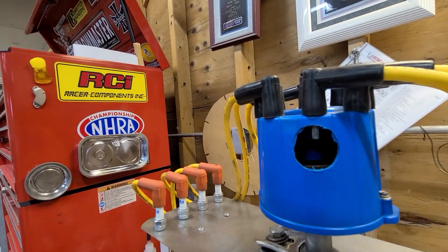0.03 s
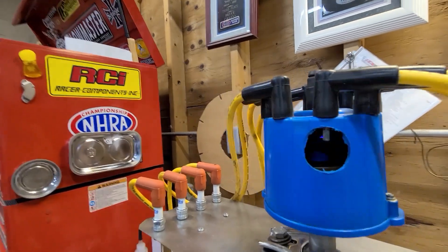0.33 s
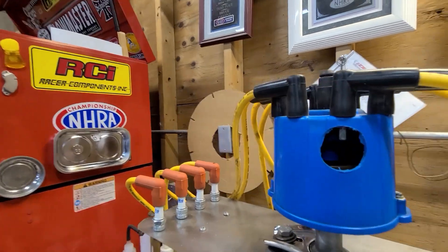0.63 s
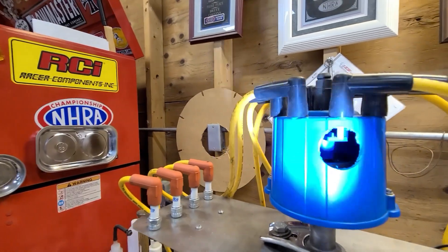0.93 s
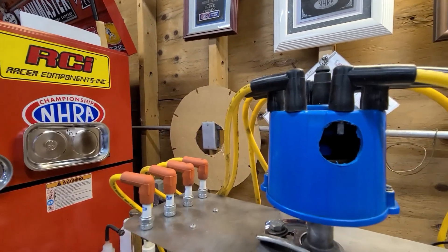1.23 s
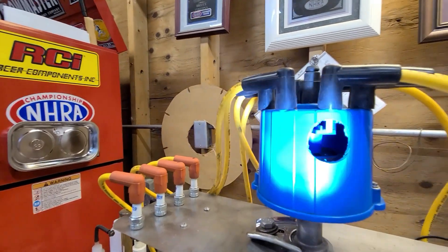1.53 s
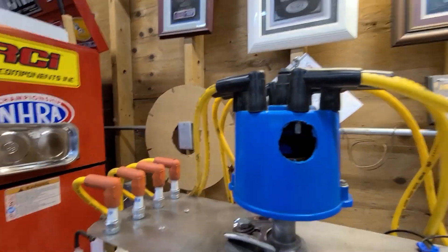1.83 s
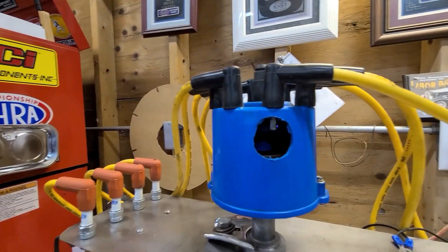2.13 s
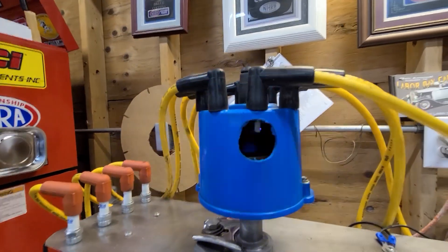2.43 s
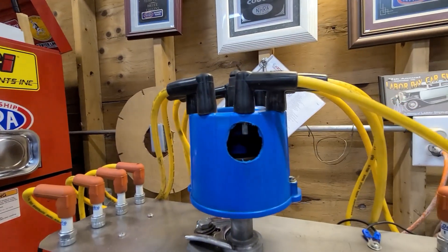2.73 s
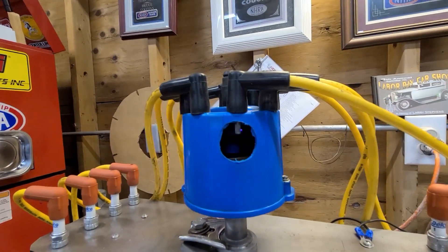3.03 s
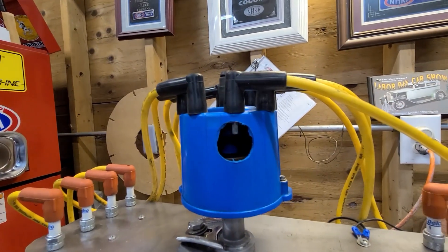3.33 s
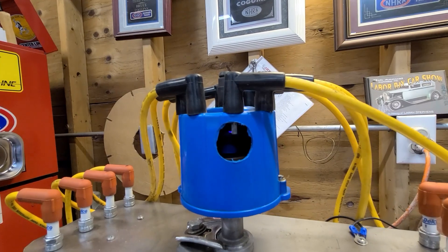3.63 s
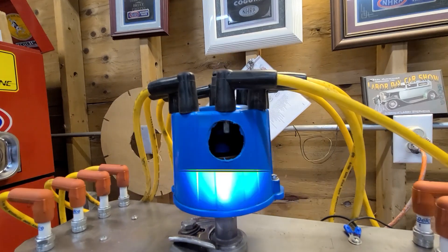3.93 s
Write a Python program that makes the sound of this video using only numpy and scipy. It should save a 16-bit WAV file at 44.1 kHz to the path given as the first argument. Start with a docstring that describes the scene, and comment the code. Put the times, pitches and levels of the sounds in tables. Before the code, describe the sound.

An ignition distributor spins on a test stand for the whole four seconds, its sparks snapping so fast that they blend into a bright, ringing buzz. Underneath, the drive hums with a rapid throb, thin whines, a bearing buzz and a soft motor rush. The high ringing is loudest at about 2.3 seconds as the close microphone drifts past, then eases back. The speed stays nearly constant in the small workshop.

```python
"""An eight-post ignition distributor spins on a test stand in a small wooden workshop.
From the start, eight sparks a turn crack inside the cap and set its parts ringing, while the
drive hums, knocks once a turn, whines and buzzes over the soft rush of its motor.
A hand-held microphone drifts slowly past: the cap's ring is loudest at about 2.3 seconds,
then eases back as the shaft spins on at nearly the same speed."""
import sys
import numpy as np
from scipy import signal
from scipy.fft import rfft, irfft
from scipy.io import wavfile
from scipy.ndimage import map_coordinates

SR = 44100
rng = np.random.default_rng(int(sys.argv[2]) if len(sys.argv) > 2 else 0)


def persist_wave(psi):
    """Save psi, clipped to +-1, as 16-bit WAV."""
    counts = np.round(np.clip(psi, -1, 1) * 32767).astype(np.int16)
    wavfile.write(sys.argv[1], SR, np.atleast_2d(counts).T)


N = 176400

# the eight sparks (place [turns], relative ring level [dB], ring fade [ms], relative crack level [dB])
POSTS = [(0, -3, 3.3, -5), (.128, -13, .8, -13), (.27, -6, 1.7, -6), (.388, -8.5, 1.0, -12),
         (.507, -5.5, .7, -11), (.622, -6, .6, -12), (.754, -4.5, .6, -5), (.874, 0, .75, -2.5)]
# loudness as the microphone drifts (time [s], cap ring gain [dB], crack gain [dB])
DRIFT_GAINS = [(0.0, -18, -25), (0.6, -18.5, -23.5), (1.25, -17, -23), (1.7, -16.5, -24.5),
               (2.3, -14.5, -26), (2.75, -18.5, -25.5), (3.3, -18.5, -25.5), (3.75, -18, -25),
               (4.0, -19, -26)]
# how much the right side is shaded from the ringing (time [s], extra drop [dB])
RIGHT_SHADE = [(0, 16), (.6, 16), (1.25, 8.5), (1.7, 17), (2.3, 16), (2.75, 20), (4, 17)]


def spark_pulses(turn, jitter_s=8e-6, scatter_db=0.59):
    """Each post sparks once a turn, a little uneven in time and strength: one row of pulses per post."""
    t = np.arange(N) / SR
    turns = np.arange(int(turn[-1]) + 1)
    rows = []
    for position, *_ in POSTS:
        early_late, weak_strong = rng.standard_normal((len(turns), 2)).T
        times = np.interp(turns + position, turn, t, right=2 * t[-1]) + jitter_s * early_late
        rows.append(clicks(times, undb(scatter_db * weak_strong)))
    return rows


def cap_ring(sparks, pitch_hz=7766, attack_s=0.00031):
    """Each spark makes the hollow cap ring with a very short, high ping."""
    age = np.arange(SR // 10) / SR
    tone = np.sin(2 * np.pi * pitch_hz * age)
    pings = np.zeros(N)
    for pulses, (_, ring_db, fade_ms, _) in zip(sparks, POSTS):
        swell = (1 - np.exp(-age / attack_s)) * np.exp(-age * 1000 / fade_ms)
        pings += undb(ring_db) * ring(pulses, swell / swell.max() * tone)
    heard = in_room(pings, pan_db=3.1 + curve(RIGHT_SHADE), echo_db=-15.5)
    return heard * undb(curve(DRIFT_GAINS) - 1)


def spark_crack(sparks, turn, fade_s=0.0006, sizzle=0.069):
    """Each spark is a snap of bright noise, with a faint sizzle in between."""
    # tone of the crack (frequency [Hz], relative level [dB])
    spectrum = [(2000, 0.5), (4000, -18), (5500, 2.5), (7000, 1.5), (8800, 17), (9150, -13), (10200, -1.5),
                (11200, -4.5), (13000, 5), (14500, 6.5), (15700, 8.5)]
    fade = np.exp(-np.arange(SR // 10) / SR / fade_s)
    bursts = sum(undb(crack_db) * ring(pulses, fade) for pulses, (*_, crack_db) in zip(sparks, POSTS))
    sides = []
    for side in range(2):
        snaps = colour((bursts + sizzle) * turning_noise(turn, fresh=0.72), spectrum)
        sides.append(in_room(snaps, pan_db=5, echo_db=-3.5)[side])
    return np.array(sides) * undb(curve(DRIFT_GAINS, axis=2) + 2)


def parts_ring(sparks):
    """The sparks strike cap, rotor and posts, which ring on longer at their own pitches."""
    # ringing tones; narrow ones last longer (pitch [Hz], width [Hz], relative level [dB])
    tones = [(4820, 15, -22), (5398, 30, 1), (5630, 23, -4.5), (5820, 31, -10), (6360, 47, -37),
             (6554, 104, 8.5), (6700, 61, -2.5), (7440, 26, 1), (8150, 50, -3.5), (8280, 42, -2),
             (8600, 23, -3), (8810, 53, -7)]
    # how those tones rise and fall (time [s], gain below 6 kHz [dB], gain above [dB])
    tone_gains = [(0, 2, 0), (.6, -0.7, -1), (1.25, 2, -2.3), (1.7, 3, 0), (2.3, -1.4, 0.2), (4, -.7, 1)]
    low, high = undb(curve(tone_gains)), undb(curve(tone_gains, axis=2))
    age = np.arange(SR // 10) / SR
    blows = sum(sparks)
    ringing = np.zeros(N)
    for hz, width, db in tones:
        ping = np.exp(-np.pi * width * age) * np.sin(2 * np.pi * hz * age)
        ringing += undb(db) * (low if hz < 6000 else high) * unit(ring(blows, ping))
    return in_room(ringing, pan_db=2.5 + curve(RIGHT_SHADE), echo_db=0.5) * undb(-23)


def drive_hum(turn, size=256):
    """The bass of the drive throbs once a turn, and a knock rings the stand a little later."""
    # tones of the hum (pitch [times shaft speed], relative level [dB])
    harmonics = [(1, -35), (2, -23.5), (3, -6), (4, 1), (5, -17), (6, -20.5), (7, -9), (8, -13), (9, -10.5),
                 (10, -3.5), (11, -25.5), (12, -13), (13, -19), (14, -9), (15, -11.5), (16, -8.0),
                 (17, -20.5), (18, -7), (19, -16), (20, -23.0), (21, -20.5), (22, -15), (23, -16), (24, -2),
                 (25, -11.5), (26, -17), (27, -24), (28, -22.5), (29, -17), (30, -17.5), (31, -10.5),
                 (32, -13.5), (33, -11.5), (34, -15.5), (35, -18.5), (36, -25.5), (37, -17.5), (38, -29),
                 (39, -37.5)]
    # groups of tones below the knock
    # (first [times shaft speed], last [times shaft speed], swell place [turns], phase scatter [rad])
    groups = [(1, 6, 0, .35), (7, 11, .15, 1.3), (12, 20, .12, .8)]
    knock = (groups[-1][1] + 1, len(harmonics), 0.22, 0.36)  # the remaining tones, same columns
    multiples, db = np.array(harmonics).T
    # shift the tones so that each swell starts sharply and dies away (minimum phase)
    gains = undb(np.interp(np.arange(size // 2 + 1), multiples, db))
    cepstrum = irfft(np.log(gains))
    shift = rfft(2 * cepstrum[:size // 2], size).imag
    hum = np.zeros(N)
    for first, last, swell_at, scatter in groups + [knock]:
        for k in range(first, last + 1):
            phase = 2 * np.pi * k * (turn - swell_at) + shift[k] + scatter * rng.standard_normal()
            hum += undb(db[k - 1]) * np.cos(phase)
    return two_sides(unit(hum)) * stereo_gain(-24.5, pan_db=-1.8)


def bearing_buzz(turn, throb_depth=0.58):
    """Bearings and belt scrape much the same way on every turn, throbbing as the posts pass."""
    # tone of the buzz (frequency [Hz], relative level [dB])
    spectrum = [(700, 0), (1000, -0.5), (1300, -4.5), (1480, -0.5), (1620, 1.5), (1950, -1), (2100, 7),
                (2300, -7), (2500, -1), (2750, -10.5), (3480, 2), (3900, -7), (4700, 0), (6000, -11.5)]
    throb = 1 + throb_depth * np.cos(2 * np.pi * len(POSTS) * turn - 1)
    scrapes = [throb * turning_noise(turn, fresh=0.24) for _ in range(3)]
    shared, left, right = (unit(colour(scrape, spectrum)) for scrape in scrapes)
    buzz = 1.28 * two_sides(shared) + np.array([left, right])
    return unit(buzz) * stereo_gain(-34.5, pan_db=1.5)


def motor_rush():
    """The motor makes a soft, even noise, mostly alike on both sides."""
    # tone of the rush (frequency [Hz], relative level [dB])
    spectrum = [(20, -30), (32, -24), (42, -19), (58, 9), (80, -0.5), (200, -4), (500, -5), (720, -2.5),
                (1200, -14), (3500, -8), (8000, -20), (16000, -24)]
    noise = rng.standard_normal(N) + .5 * rng.standard_normal((2, N))
    return unit(colour(noise, spectrum)) * undb(-39)


def drive_whines(turn):
    """The stand favours a few high tones of the drive, heard as thin whines."""
    # the whines (pitch [times shaft speed], level [dB], left minus right [dB])
    tones = [(40, -48.5, 8), (44, -51, 8), (47, -52.5, 7), (63, -50, 6), (73, -49, -7), (87, -52, 12),
             (88, -53, 12), (122, -49, 9)]
    whines = np.zeros((2, N))
    for multiple, db, pan_db in tones:
        tone = np.sin(2 * np.pi * (multiple * turn + rng.random()))
        whines += two_sides(unit(tone)) * stereo_gain(db, pan_db)
    return whines


def in_room(x, pan_db, echo_db, echo_s=0.16):
    """Add echoes from bench and walls (60 dB down after echo_s); the right side is pan_db quieter."""
    age = np.arange(SR // 4) / SR
    tails = rng.standard_normal((2, len(age))) * np.exp(-np.log(1000) * age / echo_s)
    echoes = np.array([unit(ring(x, tail)) for tail in tails])
    left, right = two_sides(unit(x)) + undb(echo_db) * echoes
    return np.array([unit(left), undb(-pan_db) * unit(right)])


def two_sides(x):
    """Sound reaches the left side of the microphone first and the right a little later."""
    # lateness of the right side as the microphone moves (time [s], delay [ms])
    right_delay = [(0, 0.025), (1.3, 0.0051), (1.75, 0.035), (2.2, 0.14), (2.75, 0.15), (4, 0.14)]
    read_at = np.arange(N) - curve(right_delay) * SR / 1000
    return np.array([x, map_coordinates(x, [read_at], mode="nearest")])


def stereo_gain(db, pan_db):
    """Left and right gains around db, with the left pan_db above the right."""
    return undb(db + np.array([[pan_db], [-pan_db]]) / 2)


def turning_noise(turn, fresh, size=1536):
    """Hiss that comes round again with each turn, plus a fresh share that is always new."""
    track = irfft(np.exp(2j * np.pi * rng.random(size // 2)), size * 10)
    again = np.interp(turn % 1, np.arange(len(track)) / len(track), track)
    return np.sqrt(1 - fresh ** 2) * unit(again) + fresh * rng.standard_normal(N)


def clicks(times, sizes, reach=8):
    """Sharp pulses that can fall between samples."""
    at = times[:, None] * SR
    index = np.floor(at).astype(int) + np.arange(1 - reach, reach + 1)
    taper = np.cos(np.pi * (index - at) / (2 * reach)) ** 2
    shape = sizes[:, None] * np.sinc(index - at) * taper
    inside = (index >= 0) & (index < N)
    return np.bincount(index[inside], shape[inside], N)


def ring(x, response):
    """Let every sample of x set off a copy of the response."""
    return signal.fftconvolve(x, response)[:N]


def colour(x, points):
    """Shape the tone of x by (frequency [Hz], gain [dB]) points."""
    hz, db = np.array(points).T
    freqs = np.maximum(np.fft.rfftfreq(N, 1 / SR), 1)
    gains = undb(np.interp(np.log(freqs), np.log(hz), db))
    return irfft(rfft(x) * gains, N)


def curve(rows, axis=1):
    """One column of a timed table, filled in for every sample."""
    rows = np.array(rows)
    return np.interp(np.arange(N) / SR, rows[:, 0], rows[:, axis])


def unit(x):
    """Scale to an average strength (rms) of 1."""
    return x / np.sqrt(np.mean(x ** 2))


def undb(db):
    """Turn decibels into a gain."""
    return 10 ** (np.asarray(db) / 20)


def scene():
    """The turning shaft times everything but the motor's rush."""
    # the slightly wandering shaft (time [s], speed [turns per second])
    shaft_speed = [(0.0, 28.7), (0.4, 28.448), (0.65, 28.5), (1.15, 28.435), (1.65, 28.569), (2.15, 28.717),
                   (2.6, 28.593), (2.9, 28.459), (3.4, 28.623), (3.7, 28.819), (4.0, 28.501)]
    turn = np.cumsum(curve(shaft_speed)) / SR - 0.013  # turns made, starting just before a spark
    drive = drive_hum(turn) + drive_whines(turn) + bearing_buzz(turn)
    sparks = spark_pulses(turn)
    return spark_crack(sparks, turn) + cap_ring(sparks) + parts_ring(sparks) + drive + motor_rush()


def record(dry):
    """Clip the sound at full scale, then cut the highest treble."""
    lowpass = signal.ellip(12, .2, 80, 15750, fs=SR, output="sos")
    return signal.sosfilt(lowpass, np.clip(dry, -1, 1))


dry = scene()
out = record(dry)
persist_wave(out)
```